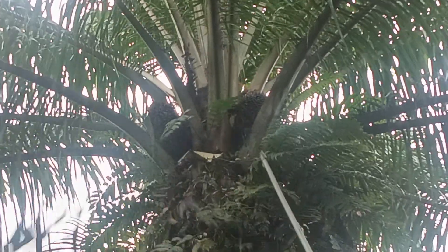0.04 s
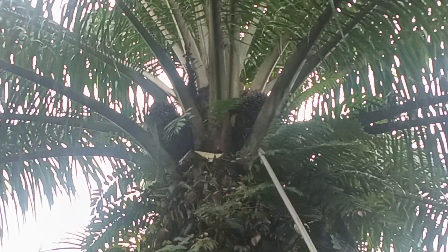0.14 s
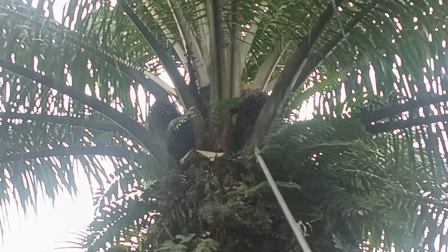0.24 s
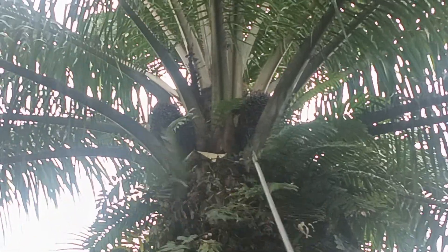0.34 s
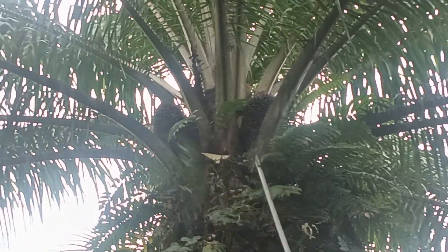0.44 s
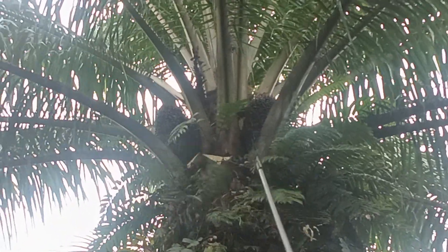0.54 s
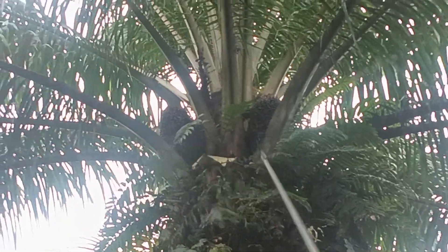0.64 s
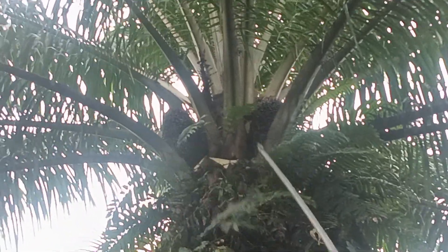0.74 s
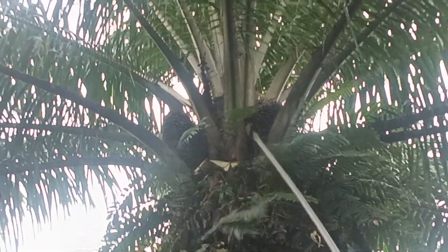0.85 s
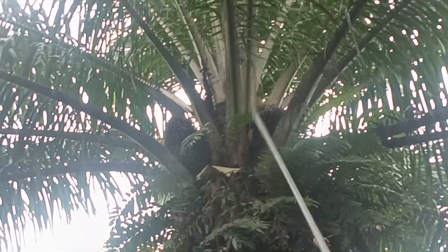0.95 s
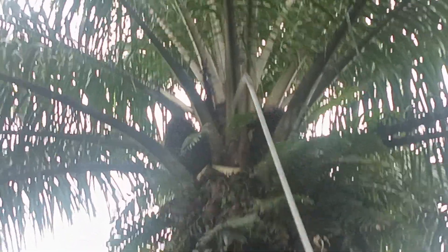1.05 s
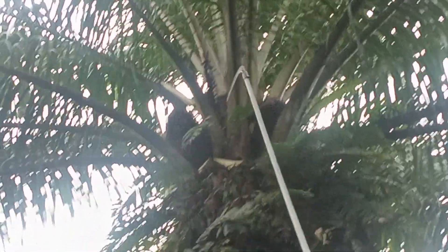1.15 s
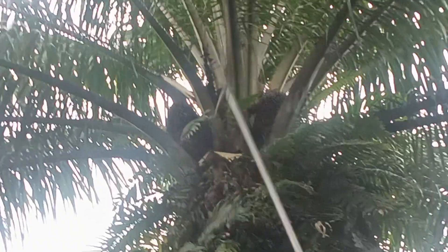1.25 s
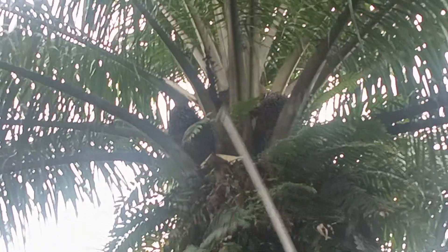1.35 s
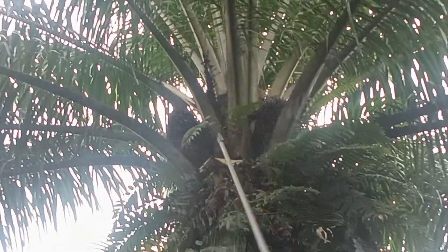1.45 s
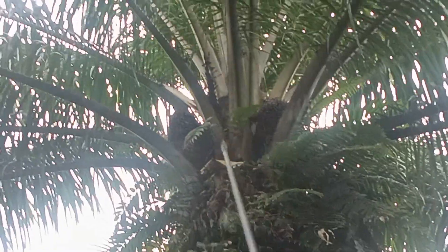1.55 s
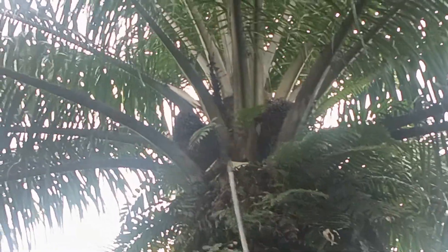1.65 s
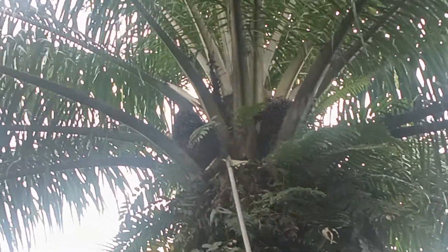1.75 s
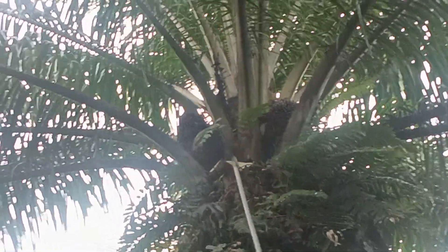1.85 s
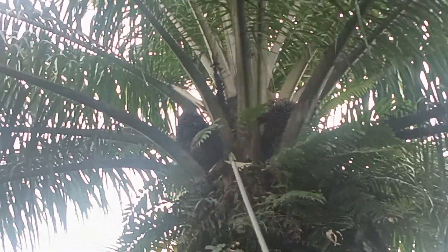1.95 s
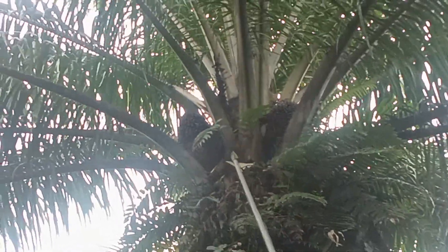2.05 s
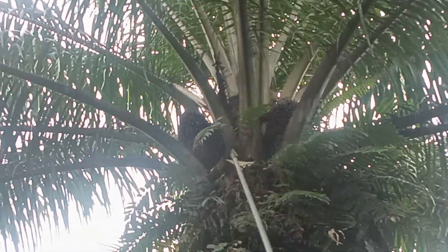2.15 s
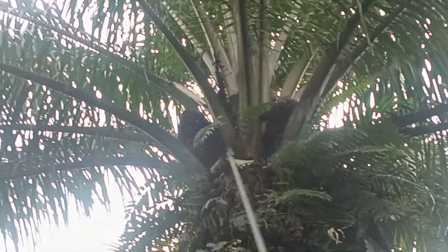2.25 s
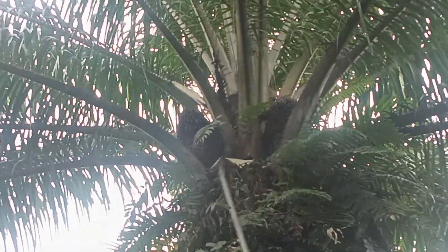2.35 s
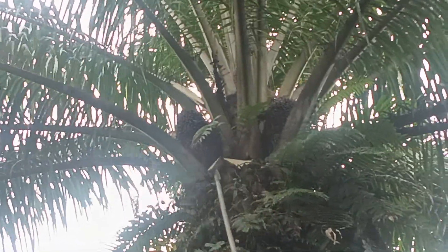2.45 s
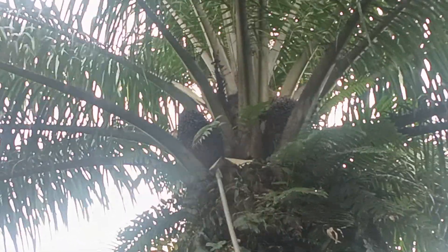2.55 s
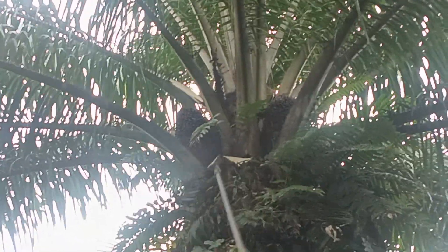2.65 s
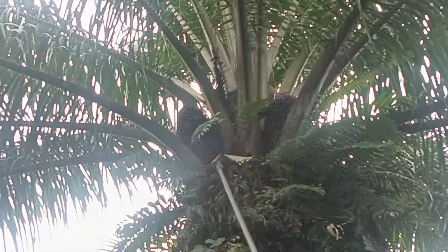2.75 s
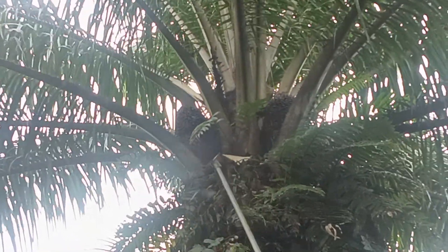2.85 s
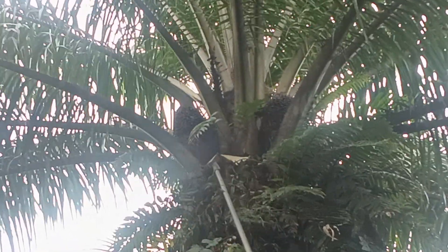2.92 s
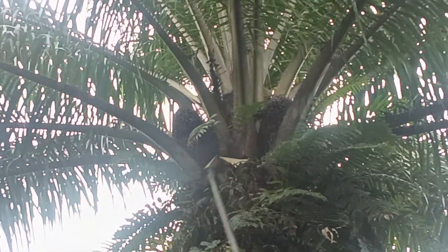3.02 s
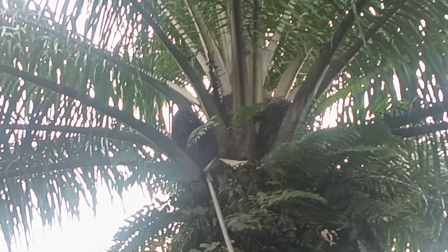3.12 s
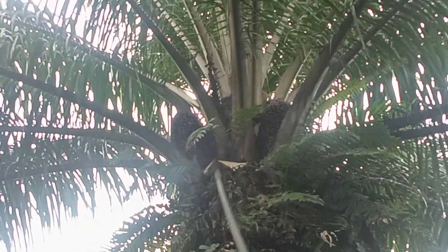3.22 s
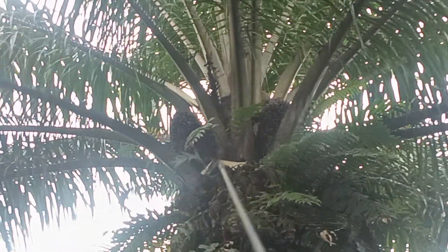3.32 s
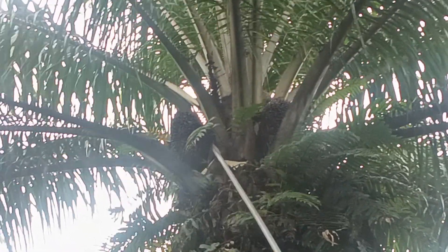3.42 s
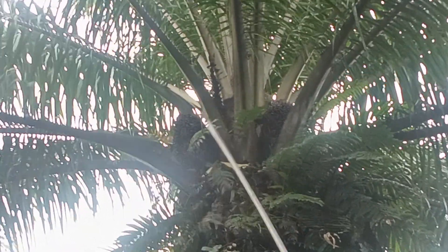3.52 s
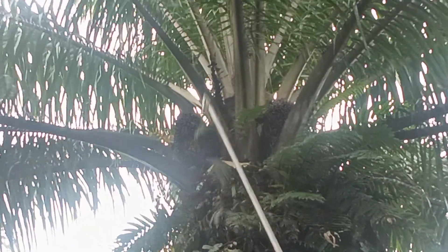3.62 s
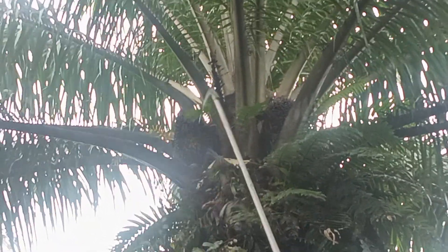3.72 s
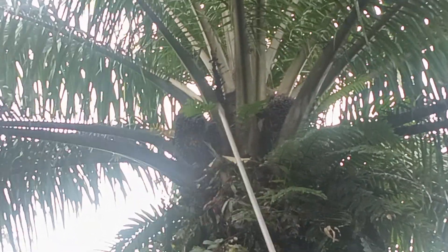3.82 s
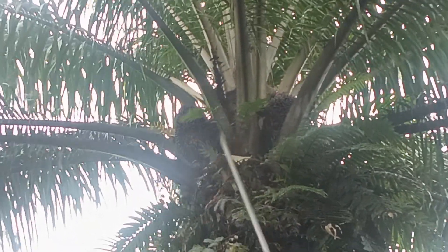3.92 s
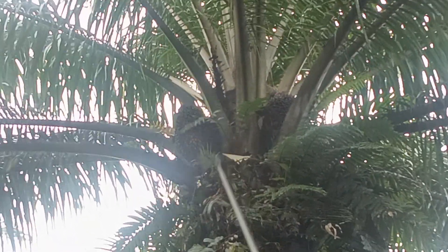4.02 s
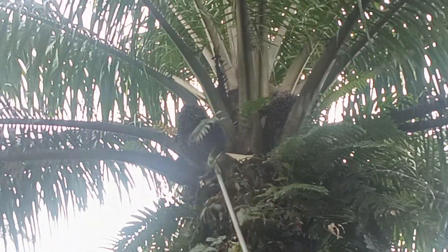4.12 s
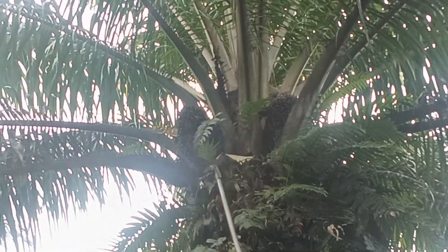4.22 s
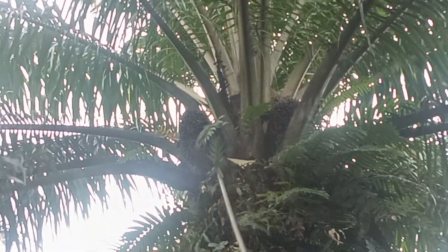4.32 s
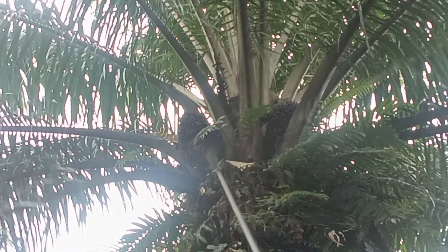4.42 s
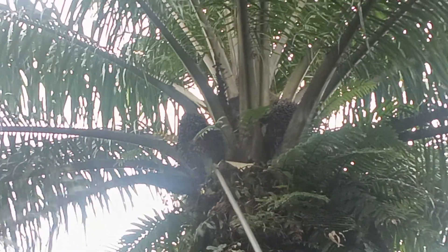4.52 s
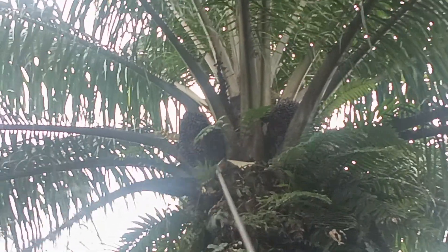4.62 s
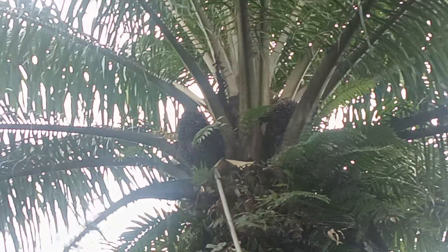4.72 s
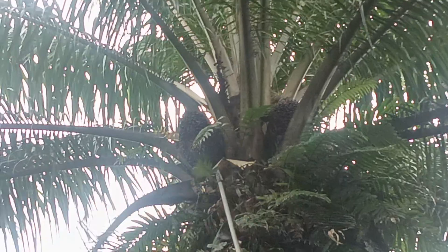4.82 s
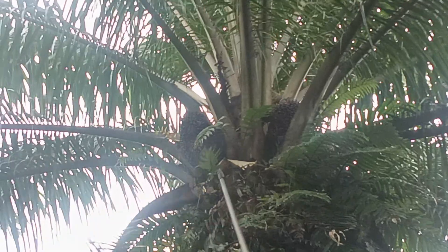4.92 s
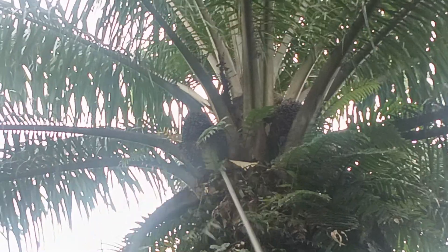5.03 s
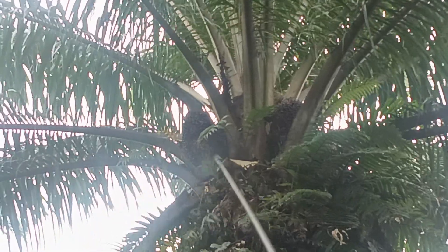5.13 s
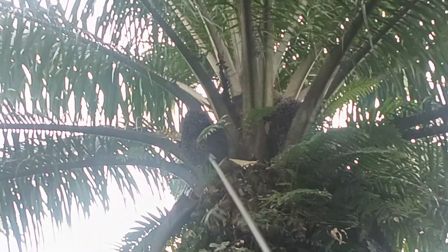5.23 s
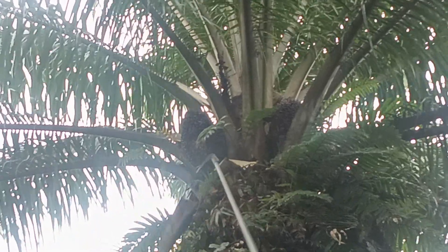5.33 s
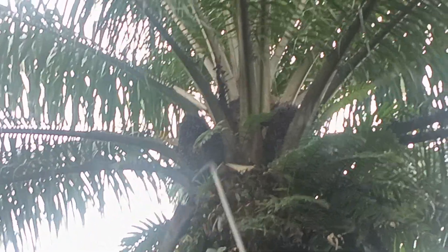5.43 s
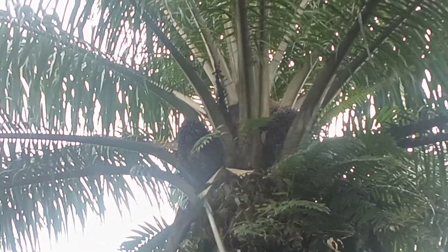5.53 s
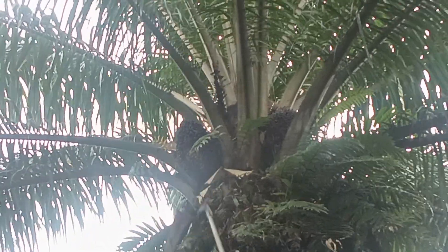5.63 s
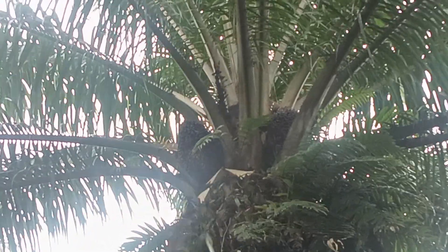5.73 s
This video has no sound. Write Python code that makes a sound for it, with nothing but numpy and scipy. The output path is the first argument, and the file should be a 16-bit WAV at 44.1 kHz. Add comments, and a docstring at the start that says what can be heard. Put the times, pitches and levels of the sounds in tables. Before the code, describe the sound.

Outdoors in a palm plantation, a heavy frond hits the ground almost at once, with a loud leafy crash, a low scraping stalk and sharp snaps, then settles in twitching rustles. A hollow pole knocks overhead, and a blade rasps briefly, then harder, through a fibrous stalk. Leaves swish as the next frond sags, and a final rip with cracks comes near the end. Faint insects, light echo; the microphone is near the ground.

```python
"""A cut oil palm frond crashes to the ground: hundreds of tiny leaflet slaps over the ploughing of its stalk.
High in the crown a sickle on a long pole rasps through the next stalk, made of fibre breaks that ring wet wood.
That frond sags with rustling leaflets, the pole knocks and rings, fibres snap and dull low blows thud.
Behind it, filtered noise makes still air, shrill insects and a low rumble; trunks add scattered echoes."""
import sys
import numpy as np
from scipy import signal
from scipy.fft import rfft, irfft
from scipy.io import wavfile
from scipy.ndimage import uniform_filter1d

SR = 44100
rng = np.random.default_rng(int(sys.argv[2]) if len(sys.argv) > 2 else 0)


def materialize(psi):
    """Save the field psi as 16-bit PCM at rate SR to the path in sys.argv[1].

    A 1-D psi becomes a single channel; in a 2-D psi each row is a channel.
    """
    bounded = np.clip(np.atleast_2d(psi).T, -1, 1)
    quanta = np.round(bounded * 32767).astype(np.int16)
    wavfile.write(sys.argv[1], SR, quanta)


N = 254456
T = np.arange(N) / SR
# the cut frond hits the ground, ploughs on through the litter and comes to rest
LAND_S, REST_S = 0.711, 1.36
STALK_RISE_S = 0.0013  # the heavy stalk takes the weight at once


def falling_frond():
    """Stiff leaflets slap the ground and tick as they are crushed, while the stalk ploughs through the litter."""
    # tone of the leaflets: (frequency [Hz], relative level per Hz [dB])
    leaf_colour = [(200, -56), (500, -15), (1000, -10.5), (1500, -5.5), (2000, -6.5), (2400, -3),
                   (3350, -1), (4400, -16), (5600, -21), (6500, -33), (9000, -36), (12500, -27),
                   (15700, -36.5)]
    # tone of the ploughing stalk: (frequency [Hz], relative level per Hz [dB])
    stalk_colour = [(30, -24), (70, -15), (125, -2.5), (200, 0.5), (400, 0), (700, -4), (1200, -3),
                    (2500, -53)]
    whip_hz, whip_width_hz, whip_db = 6600, 3800, 2.5  # leaflets whip brightly while they are still free
    muffle = 0.4  # share of the treble that is lost once they lie in the litter

    slaps = crackle(per_s=12000, spread_db=2.5, clump_db=0.8, clump_hz=220)
    leaves = unit(colour(slaps, leaf_colour))
    scrapes = crackle(per_s=2500, spread_db=1.5, clump_db=1.4, clump_hz=50)
    stalk = unit(colour(scrapes, stalk_colour))

    grounded = np.clip((T - LAND_S) / (REST_S - LAND_S), 0, 1)  # 0 in the air, 1 at rest
    whip = ring(ring(leaves, whip_hz, whip_width_hz), whip_hz, whip_width_hz)
    whip *= amp(whip_db) * (1 - grounded)
    lost_treble = muffle * treble(leaves) * grounded ** 4
    leaves = (leaves + whip - lost_treble) * amp(-2 * grounded)
    ticks = leaflet_ticks() * amp(-9 + 5 * grounded)  # more ticking as they are crushed
    weight = swell(LAND_S, db=-30, rise_s=STALK_RISE_S, hold_s=0.58, fade_db_per_s=81)
    return amp(-0.7) * (leaves + ticks) * leaflet_force() + stalk * weight


def leaflet_force():
    """How hard the falling leaflets are worked: flight, ploughing, settling, and bunches on top."""
    # bunches of leaflets sweep past the trunk or slap down together:
    # (middle [s], level before a small final cut [dB], spread either side [s])
    bunch_rows = [(0.0, -36, 0.059), (0.841, -13, 0.026), (1, -19, 0.02), (1.189, -13.5, 0.1),
                  (1.365, -19, 0.017), (1.543, -31.5, 0.038), (1.688, -34, 0.017)]
    flutter_db, flutter_hz = 2.5, 28.6  # the twitching comes in flurries

    rush = amp(-35.5 - 90 * abs(T - LAND_S))  # swells up to the landing and fades after it
    flight = together([amp(-45), rush]) * (T < REST_S)
    # the leaflets fold onto the ground
    plough = swell(LAND_S, db=-18, rise_s=0.087, hold_s=0.46, fade_db_per_s=110)
    # they go on twitching after the frond stops
    settle = swell(LAND_S, db=-29, rise_s=STALK_RISE_S, hold_s=REST_S - LAND_S, fade_db_per_s=26.5)
    settle *= amp(flutter_db * wander(flutter_hz))
    bunches = [amp(db) * np.exp(-((T - s) / spread_s) ** 2 / 2) for s, db, spread_s in bunch_rows]
    return together([flight, plough, settle] + bunches)


def leaflet_ticks(per_s=800, t60=0.01, count=24):
    """Single stiff leaflets flick, each with a short note of its own."""
    t, out = np.arange(SR // 20) / SR, np.zeros(N)
    for hz in np.geomspace(1600, 3900, count) * rng.uniform(.98, 1.02, count):
        note = np.sin(2 * np.pi * hz * t) * t * amp(-60 * t / t60)
        flicks = crackle(per_s / count, spread_db=0.9, clump_db=0.18, clump_hz=25)
        out += signal.oaconvolve(flicks, note)[:N]
    return unit(out)


def crown():
    """Leaflets slide over each other as the next frond sags, flare at each jerk, and rustle on faintly and duller."""
    # tone of the swish: (frequency [Hz], relative level per Hz [dB])
    swish_colour = [(120, -20), (260, -13.5), (540, -5), (1000, -6), (1600, -1), (3100, 3), (4400, -3),
                    (5500, -6), (7000, -20), (9000, -27.5), (13000, -19), (15700, -27)]
    # the frond sags in the crown: (start [s], level [dB], rise [s], hold [s])
    sag_rows = [(3.28, -38.5, 0.76, 0.19), (5.152, -33.5, 0.96, 0.1)]
    # jerks of the blade shake its leaflets: (time [s], level [dB])
    shake_rows = [(3.735, -40.5), (3.91, -40), (4.17, -38), (5.085, -41), (5.156, -40.5), (5.295, -44),
                  (5.435, -43), (5.632, -29.5)]
    linger_db = -12.5  # faint leaf rustle that lingers after each sag, relative to the sag

    slides = crackle(per_s=16000, spread_db=4.0, clump_db=0.9, clump_hz=108)
    leaves = patchy(colour(slides, swish_colour), depth_db=0.7)
    first_start, _, first_rise, first_hold = sag_rows[0]
    hanging = np.clip(T - first_start - first_rise - first_hold, 0, 1)
    leaves = leaves - 0.2 * hanging * treble(leaves)

    sags = [swell(s, db, rise, hold, fade_db_per_s=50) for s, db, rise, hold in sag_rows]
    lingering = [swell(s, db + linger_db, rise, hold, fade_db_per_s=0.5) for s, db, rise, hold in sag_rows]
    shakes = [swell(s, db, rise_s=0.0065, hold_s=0, fade_db_per_s=163) for s, db in shake_rows]
    return leaves * together(sags + lingering + shakes)


def sickle():
    """The blade parts many fine fibres and a few thick ones; each break rings the wet stalk."""
    # the blade is pulled through the stalk:
    # (start [s], level of the pull's force [dB], rise [s], hold [s], fade [dB per s])
    pulls = [(2.378, -46, 0.056, 0.008, 121), (3.149, -27.5, 0.15, 0.048, 121),
             (5.376, -40.5, 0.025, 0.68, 150), (5.571, -27, 0.039, 0.019, 500)]
    # tone of the breaking fibres: (frequency [Hz], relative level per Hz [dB])
    pull_colour = [(70, -37), (150, -14), (320, -11), (470, -4), (800, -4.5), (1200, -3.5), (2000, -7),
                   (3300, -6), (4400, -13.5), (5500, -17), (7000, -29), (12500, -32), (15700, -32)]
    # resonances of the wet stalk: (pitch as a pull starts [Hz], width [Hz], level before it weakens [dB])
    wet_stalk = [(435, 30, 6), (584, 77, 0.5), (1910, 270, 2), (2870, 360, -2)]
    stiffen_per_s = 0.65  # pitches climb as each pull shortens the uncut fibres
    rough_db, rough_hz = 1.07, 34.6  # the edge sticks and slips as it goes

    fine = crackle(per_s=7000, spread_db=2.4, clump_db=1, clump_hz=200)
    thick = crackle(per_s=170, spread_db=1.5, clump_db=1, clump_hz=30)
    breaks = colour(unit(fine + amp(-6) * thick), pull_colour)

    starts = np.array([pull[0] for pull in pulls])
    since_start = np.clip(T - starts[np.searchsorted(starts, T) - 1], 0, .5)
    climb = 1 + stiffen_per_s * since_start
    wood = sum(amp(db) * moving_ring(breaks, hz * climb, width) for hz, width, db in wet_stalk)
    rasp = breaks + wood * np.interp(T, [3.5, 5.3], [1, .2])  # rings less when nearly severed

    # each pull has a second swell of force with a quick fade
    second_swells = [swell(s, db - 1.5, rise_s=0.087, hold_s=0, fade_db_per_s=260) for s, db, *_ in pulls]
    force = together([swell(*pull) for pull in pulls] + second_swells)
    force = force * amp(rough_db * wander(rough_hz))
    return soften(patchy(rasp, depth_db=2), force, bright_db=-39.5, share=0.98) * force


def pole():
    """A woody crack over a hollow body, a rebound, the tube's ring damped by the grip, and clattering joints."""
    # hard knocks of the pole and the stalk: (time [s], level before the pole's filtering [dB],
    # starting pitch of the crack [Hz], hollow body relative to the crack [dB])
    knocks = [(0.3358, -18.5, 2110, -3.5), (0.711, -11, 1880, -4), (1.6652, -21, 1390, 0),
              (2.394, -32, 2300, -7), (2.615, -37, 1510, 4), (3.114, -35, 1830, -7),
              (3.374, -15.5, 1760, -4), (3.415, -27.5, 1900, 3.5), (4.391, -21, 1850, -7.5),
              (4.728, -36.5, 1500, 0.5), (5.0705, -22, 1660, -4), (5.381, -31, 1590, 0),
              (5.398, -18, 1780, -5)]
    # notes of the tube: (average pitch [Hz], relative level [dB], time to fall 60 dB without the grip [s])
    tube_notes = [(534, -20, 0.44), (705, -16, 0.24), (850, -14.5, 0.065), (1083, -8, 0.1),
                  (1240, -17, 0.085), (1513, -10, 0.098), (1695, -15, 0.089), (2006, -8.5, 0.06)]
    clatter_colour = [(250, -35), (600, -4), (2000, -2), (3200, 8), (6000, -31), (10000, -71)]  # (Hz, dB)
    tube_db, grip_db_per_s = 1.5, 128  # the tube's ring, and how fast the grip damps it
    clatter_db, clatter_t60 = -17, 0.15  # level [dB], time to fall 60 dB [s]

    out, t = np.zeros(N), np.arange(SR // 4) / SR
    for s, db, hz, body_db in knocks:
        crack = contact(t, hz, peak_s=0.00055)
        blow = crack + amp(body_db) * contact(t, hz=960, peak_s=0.00049)
        tube = np.zeros(len(t))
        for note_hz, note_db, t60 in tube_notes:
            gain = amp(note_db + 2 * rng.standard_normal() - 60 * t / t60) * rng.choice([-1, 1])
            tube += gain * np.sin(2 * np.pi * note_hz * rng.uniform(0.97, 1.03) * t)
        tube *= (1 - np.exp(-t / .003)) * amp(body_db + tube_db - grip_db_per_s * t)
        clatter = unit(colour(rng.standard_normal(len(t)), clatter_colour))
        clatter *= amp(clatter_db - 60 * t / clatter_t60)
        add(out, s, amp(db) * (blow + tube + clatter))
        add(out, s + rng.uniform(0.00215, 0.0056), amp(db - 11) * blow)  # the rebound
    # the thin pole radiates no bass, and the soft stalk cushions the treble
    return band(out, 450, 2630, order=4)


def snaps():
    """Fibres and leaf ribs crack with a broad click and a short note, then fray; dry ones spit treble."""
    # the loudest snaps: (time [s], peak level [dB], pitch [Hz], treble relative to the note [dB])
    snap_rows = [(0.7528, -9, 2610, -34), (0.9763, -6, 1960, -23), (0.985, -18, 3044, 7),
                 (1.034, -20, 2970, 6), (1.18, -3.5, 2900, -12.5), (1.217, -5, 3070, -44),
                 (1.339, -15, 3070, -5), (1.35, -5.5, 3440, -38), (1.3608, -8, 2860, -12.5),
                 (1.7536, -27, 2860, -29), (1.8336, -26, 2900, -27), (2.0275, -34, 3100, -35),
                 (2.207, -37, 1140, -18), (2.7248, -28, 2230, -26), (3.105, -28.5, 2100, -25),
                 (5.091, -31, 3200, -11), (5.447, -25.5, 3430, -25), (5.6145, -15, 2130, -32),
                 (5.627, -11, 3010, -21), (5.631, -13.5, 3100, -26)]
    dry_db = -21.5  # snaps with less treble than this are green: slower and narrower
    crack_t60, fray_t60 = 0.012, 0.07  # times to fall 60 dB [s]

    out, t = np.zeros(N), np.arange(SR // 8) / SR
    for s, db, hz, treble_db in snap_rows:
        dryness = amp(min(treble_db - dry_db, 0) / 2)  # 1 when dry, less when green
        onset = 1 - np.exp(-t * dryness ** 2 / 0.00012)
        fall = amp(-60 * t / crack_t60) + amp(-16 - 60 * t / fray_t60)
        burst = rng.standard_normal(len(t)) * onset * fall
        note = unit(ring(ring(burst, hz, 0.24 * hz), hz, 0.24 * hz))
        click = amp(-3) * dryness * unit(band(burst, 500, 4600, order=4))
        spit = amp(treble_db) * unit(ring(burst, 13000, 1900))
        crack = note + click + spit
        add(out, s, amp(db) * crack / abs(crack).max())
    return out


def thuds():
    """Dull low blows without ring: the stalk butt landing and settling, and the sickle biting in."""
    # dull blows: (time [s], peak level [dB], upper edge [Hz], time to fall 60 dB [s])
    thud_rows = [(0.712, -20.5, 810, 0.017), (0.714, -29, 163, 0.51), (1.466, -27.5, 910, 0.18),
                 (1.535, -27, 1267, 0.2), (1.652, -30, 1000, 0.15), (1.682, -29, 870, 0.17),
                 (3.082, -35, 254, 0.033), (3.177, -37, 766, 0.17)]
    out, t = np.zeros(N), np.arange(SR // 3) / SR
    for s, db, hz, t60 in thud_rows:
        push = rng.standard_normal(len(t)) * amp(-60 * t / t60)
        blow = band(push, hz / 3, hz, order=2)
        add(out, s, amp(db) * blow / abs(blow).max())
    return out


def grove(x):
    """Scattered echoes from trunks and crowns, each band dying at its own speed."""
    # echo among the trunks: (frequency [Hz], time to fall 60 dB [s])
    echo_times = [(150, 0.38), (1000, 0.48), (3000, 0.92), (7000, 0.75), (14000, 0.15)]
    # random single echoes, none sooner than 6 ms
    taps = rng.standard_normal(SR) * (rng.random(SR) < 2500 / SR) * (T[:SR] > .006)
    hz, t, z = signal.stft(taps, SR, nperseg=256)
    fall = amp(-60 * t / read(echo_times, hz)[:, None])
    tail = signal.istft(z * fall, SR, nperseg=256)[1]
    return signal.oaconvolve(x, tail / np.linalg.norm(tail))[:N]


def plantation():
    """Noise shaped into distant foliage, narrow bands of insect song and an uneven low rumble."""
    # tone of the still plantation: (frequency [Hz], relative level per Hz [dB])
    air_colour = [(120, -12), (270, -0.5), (600, -5.5), (1000, -4), (2700, -3.5), (3500, -3), (4400, -12),
                  (5500, -12), (7600, -31), (15700, -37)]
    # insect bands: (middle [Hz], spread either side [Hz], average level [dB])
    insects = [(5353, 310, -57), (6580, 250, -70), (2900, 170, -62)]
    # course of the rumble, before a 2 dB cut and slow wandering: (time [s], level [dB])
    rumble_course = [(0, -50), (1.5, -54.5), (2.2, -48.5), (2.7, -49), (3.1, -53), (4.9, -56.5),
                     (5.77, -48.5)]
    # tone of the rumble: (frequency [Hz], relative level per Hz [dB])
    rumble_colour = [(25, -16), (50, -13.5), (78, 1.5), (110, -0.5), (150, -2), (220, -8), (600, -47.5)]

    air = amp(-52) * unit(colour(rng.standard_normal(N), air_colour))
    hz, chorus = np.fft.rfftfreq(N, 1 / SR), np.zeros(N)
    for middle_hz, spread_hz, db in insects:
        shape = np.exp(-((hz - middle_hz) / spread_hz) ** 2 / 2)
        song = unit(irfft(rfft(rng.standard_normal(N)) * shape, N))
        chorus += amp(db + 0.15 * wander(38)) * song
    rumble = unit(colour(rng.standard_normal(N), rumble_colour))
    rumble_db = np.interp(T, *np.transpose(rumble_course)) - 2 + 2 * wander(1.5)
    return air + chorus + rumble * amp(rumble_db)


def amp(db):
    """Decibels to gain."""
    return 10 ** (np.asarray(db) / 20)


def unit(x):
    """Scales to an average (rms) strength of 1."""
    return x / np.sqrt(np.mean(x ** 2) + 1e-20)


def read(points, hz):
    """Reads a curve of (Hz, value) points on a log-frequency axis."""
    f, value = np.transpose(points)
    return np.interp(np.log(hz + 1), np.log(f + 1), value)


def add(mix, s, sound):
    """Lays a sound into the mix at time s."""
    part = mix[max(round(s * SR), 0):][:len(sound)]
    part += sound[:len(part)]


def colour(x, points):
    """Filter with the given tone that never acts ahead of time, so that clicks keep their sharp fronts."""
    hz = abs(np.fft.fftfreq(4096, 1 / SR))
    log_gain = np.log(amp(np.maximum(read(points, hz), -100)))
    taps = np.fft.ifft(np.exp(np.conj(signal.hilbert(log_gain)))).real  # minimum phase
    return signal.oaconvolve(x, taps[:len(taps) // 2])[:len(x)]


def band(x, low_hz, high_hz, order):
    """Keeps what lies between two frequencies."""
    return signal.sosfilt(signal.butter(order, [low_hz, high_hz], "band", fs=SR, output="sos"), x)


def treble(x):
    """The fizz at the top of a rustle."""
    return signal.sosfiltfilt(signal.butter(2, 7000, "high", fs=SR, output="sos"), x)


def ring(x, hz, width_hz):
    """A resonance of gain 1."""
    return signal.lfilter(*signal.iirpeak(hz, hz / width_hz, SR), x)


def moving_ring(x, hz, width_hz):
    """A resonance of gain 1 that follows a pitch curve."""
    turn = np.exp(2j * np.pi * np.cumsum(hz) / SR)
    r = np.exp(-np.pi * width_hz / SR)
    # shift the pitch down to zero, smooth there, and shift back up
    return 2 * (turn * signal.lfilter([1 - r], [1, -r], x / turn)).real


def contact(t, hz, peak_s):
    """One short blow; bending waves bring the high notes first, so it glides down."""
    envelope = t / peak_s * np.exp(1 - t / peak_s)
    return envelope * np.cos(2 * np.pi * hz * t / (1 + t / 0.022))


def wander(rate):
    """Slow chance of rms 1, up to about the given rate in Hz."""
    slow = 1 / (1 + (np.fft.rfftfreq(N, 1 / SR) / rate) ** 4)
    return unit(irfft(rfft(rng.standard_normal(N)) * slow, N))


def crackle(per_s, spread_db, clump_db, clump_hz):
    """Tiny breaks and touches of uneven size that come in clumps."""
    clicks = (rng.random(N) < per_s / SR) * rng.choice([-1., 1.], N)
    sizes_db = spread_db * np.minimum(rng.exponential(1, N), 4)
    return unit(clicks * amp(sizes_db + clump_db * wander(clump_hz)))


def patchy(x, depth_db):
    """Each leaflet or fibre favours its own bands for a moment."""
    z = signal.stft(x, nperseg=256)[2]
    field = uniform_filter1d(rng.standard_normal(z.shape), size=5, axis=0)
    field = unit(uniform_filter1d(field, size=5, axis=1))
    return unit(signal.istft(z * amp(depth_db * field), nperseg=256)[1][:N])


def swell(start, db, rise_s, hold_s, fade_db_per_s):
    """Gain of one gesture: an eased rise, a hold and a steady fade."""
    t = T - start
    rise = np.sin(np.pi / 2 * np.clip(t / rise_s, 0, 1)) ** 2
    return rise * amp(db - fade_db_per_s * np.maximum(t - rise_s - hold_s, 0))


def together(gains):
    """Separate rustles add in power."""
    return np.sqrt(sum(gain ** 2 for gain in gains))


def soften(x, force, bright_db, share):
    """Gentle touches lack the treble of hard ones."""
    return x - share * treble(x) * np.exp(-force / amp(bright_db))


def scene():
    """All sources among the palms, with their echoes."""
    rustle = falling_frond() + crown() + sickle()
    hits = pole() + snaps() + thuds()
    echo = grove(amp(-16) * rustle + amp(-10) * hits)
    return (rustle + hits + echo + plantation())[None]


def record(dry):
    """The microphone sheds deep bass; peaks round off just under full scale; then the top is cut."""
    thin = signal.sosfilt(signal.butter(2, 50, "high", fs=SR, output="sos"), dry)
    held = thin / (1 + thin ** 8) ** (1 / 8)
    low_pass = signal.firwin(511, 15650, window=("kaiser", 9), fs=SR)  # cutoff in Hz
    return signal.oaconvolve(held, low_pass[None], "same")


dry = scene()
out = record(dry)
materialize(out)
```